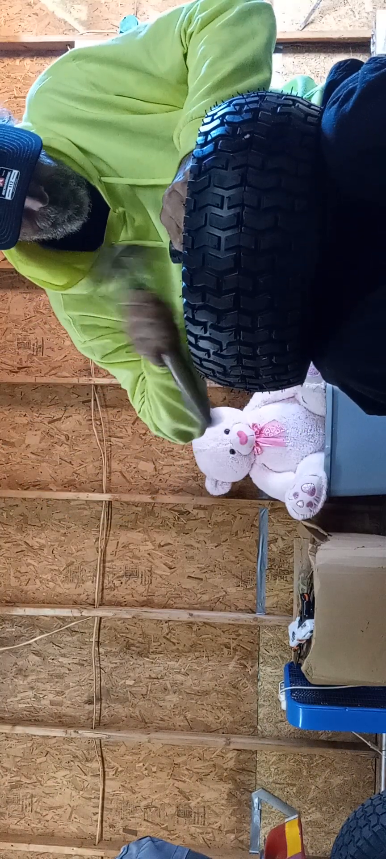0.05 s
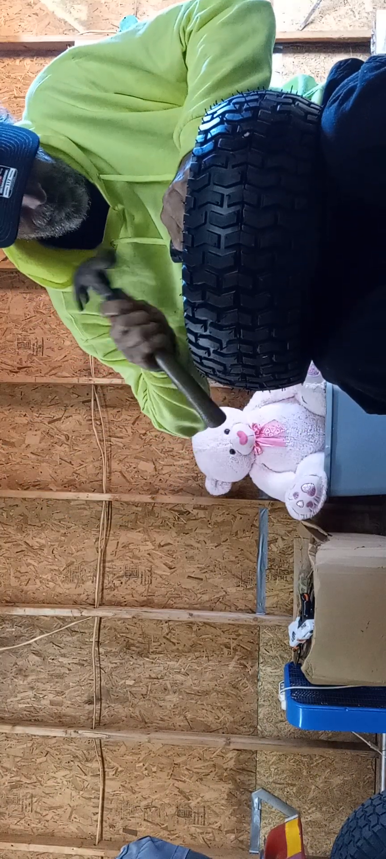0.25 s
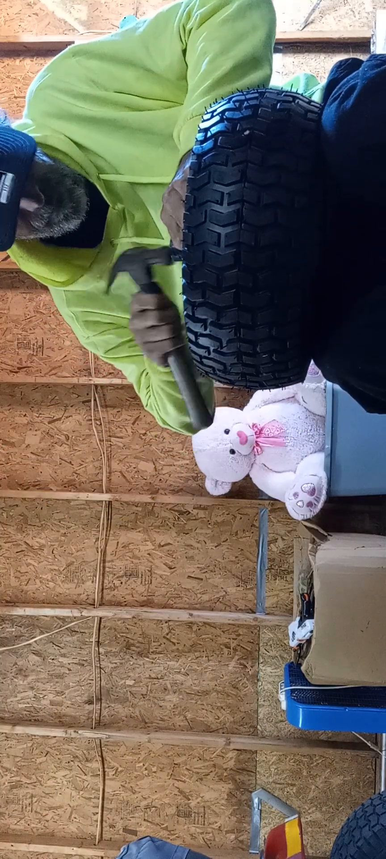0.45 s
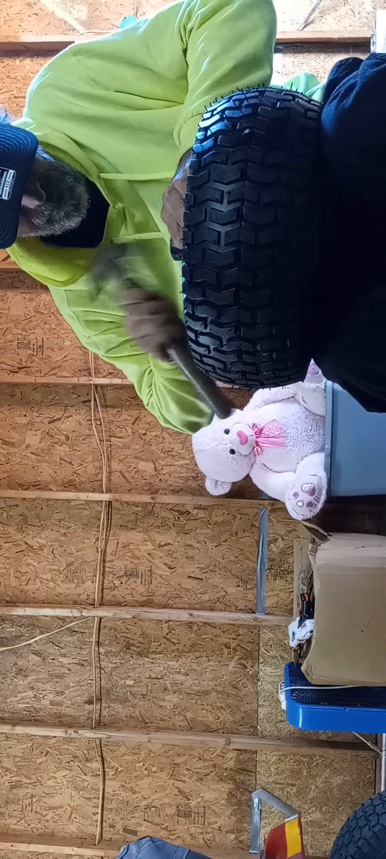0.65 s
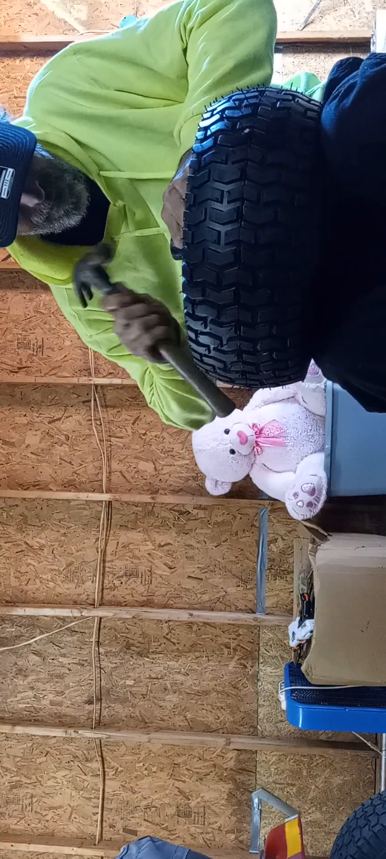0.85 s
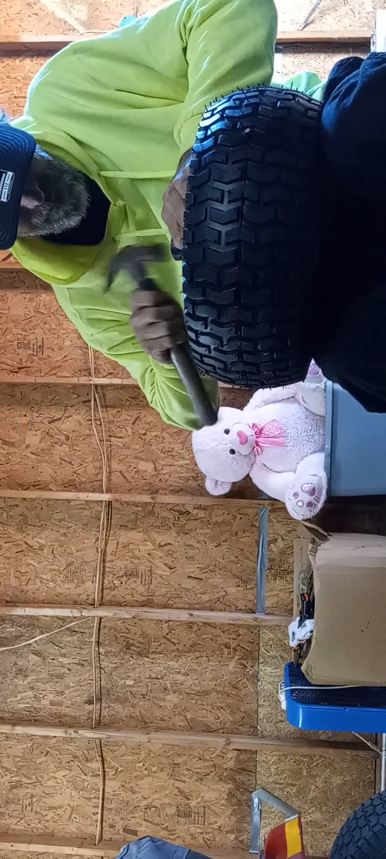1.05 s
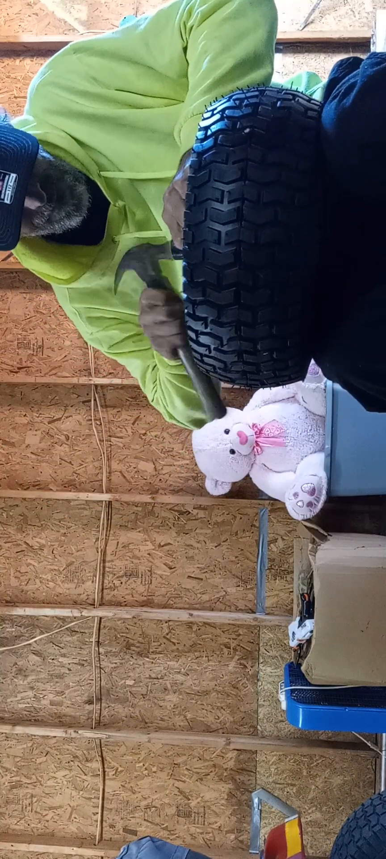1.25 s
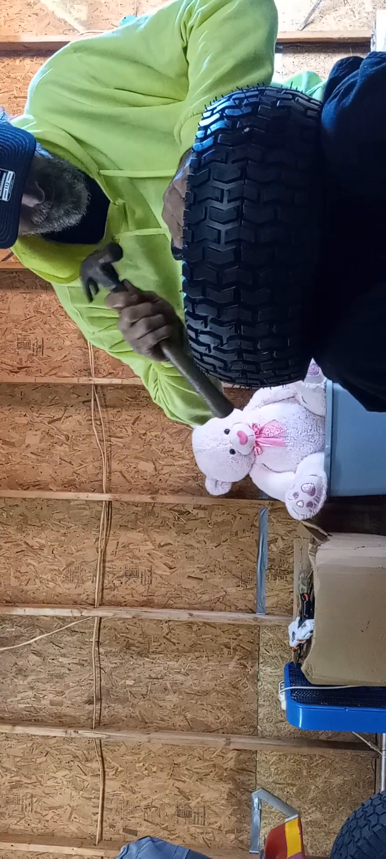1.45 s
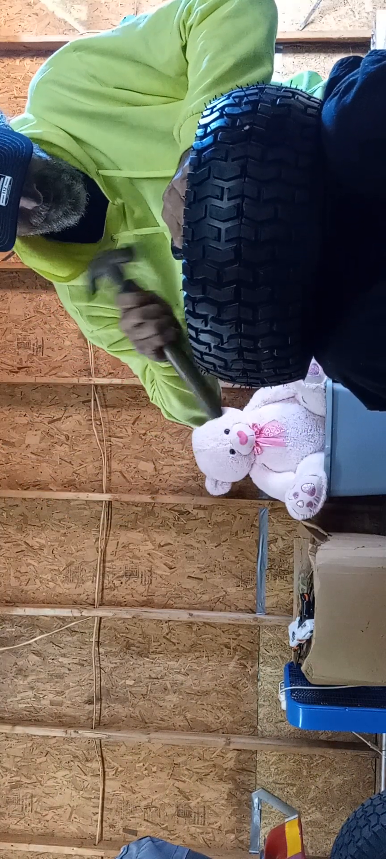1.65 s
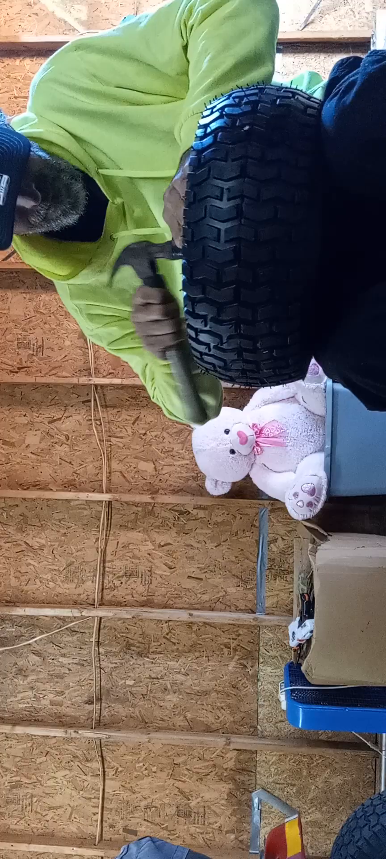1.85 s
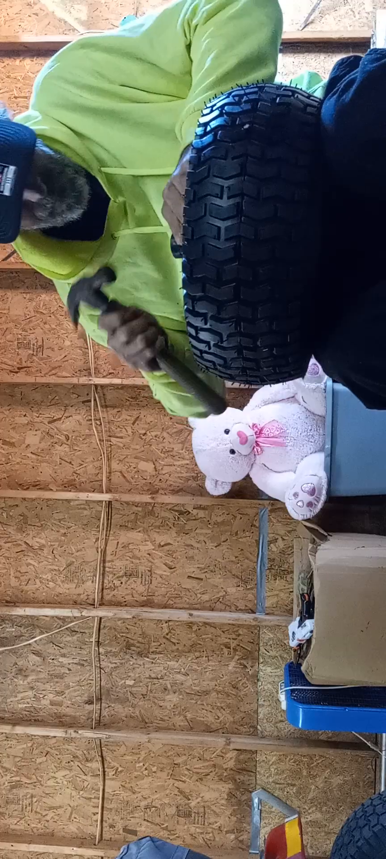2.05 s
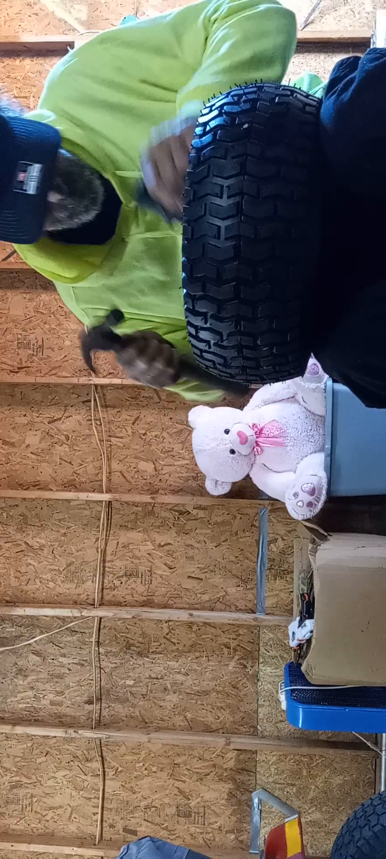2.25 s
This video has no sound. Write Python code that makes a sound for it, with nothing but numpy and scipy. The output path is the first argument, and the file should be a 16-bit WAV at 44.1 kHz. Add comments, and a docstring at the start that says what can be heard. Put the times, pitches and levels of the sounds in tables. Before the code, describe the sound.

Close to the microphone, a hammer hits a steel bearing in a wheel hub seven times at a steady pace. Each hard, hollow clank rings briefly with a short garage echo, then the wheel bumps softly.

```python
"""A claw hammer drives a bearing into the hub of a small tyred wheel, in a wooden garage.
Evenly paced blows: hard contact crack, hollow wheel thud, short ring of steel modes.
The garage answers each with the same wall echoes and standing waves, plus a noise tail.
Close range: the blows are limited and overload the microphone. Last, a soft bump as the wheel is handled."""
import sys
import numpy as np
from scipy import signal
from scipy.fft import rfft, irfft, next_fast_len
from scipy.io import wavfile
from scipy.ndimage import uniform_filter1d

SR = 44100
rng = np.random.default_rng(int(sys.argv[2]) if len(sys.argv) > 2 else 0)


def wrap_up_sound(samples):
    """Save the sound to the file named by the first command line argument, as 16-bit audio."""
    columns = np.atleast_2d(samples).T
    # keep every value between -1 and 1, then stretch to whole-number steps
    tamed = np.clip(columns, -1, 1)
    steps = np.round(tamed * 32767).astype(np.int16)
    wavfile.write(sys.argv[1], SR, steps)


N = 101429
AGE_S = np.arange(int(.8 * SR)) / SR

# hammer blows: (time [s], level [dB], bearing ring [dB], head ring [dB], rim ring [dB],
# treble shelf [dB], thud [dB], thud pitch [ratio])
HAMMER_BLOWS = [(-0.125, -7.5, -1, -3, -6, -4, -2.5, 1.0), (0.206, 0.5, -1, 0, 1, 1, -0.5, 1),
                (0.5303, 0, -3, 4, -4, 1, 0, 0.97), (0.8195, 0.5, 1, -15, -6, 0, 0, .98),
                (1.1033, 2, 0, 3.5, -13, -1.5, -0.5, 1), (1.3899, 0.5, -1, -0.5, -7, 1, -0.5, 1.01),
                (1.6604, 4.5, 1.5, -8.5, -12, -3, 0, 1.015), (1.9352, 0.5, 0, -7.5, -7.5, 3.5, -0.5, 1.03)]
# contact crack spectrum: (frequency [Hz], density [dB])
CRACK_SPECTRUM = [(30, -25), (100, -17), (250, -8.5), (600, -8), (1100, 9), (2000, 2), (2900, -1),
                  (3600, -15), (6000, -1), (9000, -17), (11000, -30), (16000, -6)]
# wheel thud: (frequency [Hz], level [dB], t60 [s])
WHEEL_MODES = [(435.7, -9.5, 0.045), (523.6, -3.5, 0.021), (696.7, -8, .028), (827, -16.5, 0.035),
               (1064, -17, 0.026), (1597, -17, 0.066), (1872, -27, 0.016)]
# seated bearing: (frequency [Hz], level [dB], t60 [s], left-right [dB])
BEARING_MODES = [(4420, -11.5, 0.021, 11), (4592, -23.5, 0.057, 21.5), (4728, -19.5, 0.022, 18),
                 (4860, -18, 0.01, 20.5), (6320, -26, 0.015, -24), (7060, -20, 0.013, -7),
                 (8610, -13, 0.0053, -4.5), (15460, -20.5, 0.021, -9)]
# hammer head: (frequency [Hz], level [dB], t60 [s], left-right [dB])
HEAD_MODES = [(5620, -20.5, 0.042, 11.5), (5642, -42, 0.35, -6.5)]
# wheel rim: (frequency [Hz], level [dB], t60 [s], left-right [dB])
RIM_MODES = [(778, -27, 0.066, 7), (1081, -46.5, 0.061, 0)]
# near-wall echoes: (delay [s], level [dB], left-right [dB])
WALL_ECHOES = [(0.0135, -7.5, -5.5), (.0205, -15, -5.5), (.041, -16, -5.5)]
# garage standing waves: (frequency [Hz], level [dB], t60 [s])
GARAGE_MODES = [(151.2, -40, .55), (187.3, -37.5, .48), (223.6, -43.5, 0.46), (303.1, -31, 0.54),
                (332.5, -28, 0.44), (382.5, -21.5, 0.37), (407, -29.5, 0.57), (435.6, -20.5, 0.33),
                (463.8, -24, 0.34), (491, -26.5, 0.34), (525, -25, .3), (607.3, -25, .4), (624, -32.5, .52),
                (690, -27.5, 0.47)]
# reverb spectrum: (frequency [Hz], density [dB])
TAIL_SPECTRUM = [(30, -45.5), (80, -35.5), (150, -9), (260, -8.5), (440, -4.5), (720, 0.5), (1050, -15.5),
                 (1500, -7), (2400, -13.5), (3600, -21.5), (4500, -18), (5200, -18.5), (6600, -18),
                 (9000, -25.5), (11000, -31), (15500, -24.5)]
# reverb decay: (frequency [Hz], t60 [s])
TAIL_DECAY = [(100, 0.49), (260, 0.56), (700, 0.47), (1840, 0.42), (4850, 0.34), (8000, .25), (12800, .19)]
# soft wheel bumps: (time [s], level [dB])
WHEEL_BUMPS = [(2.2115, -34.5), (2.219, -32.5), (2.2305, -39.5), (2.240, -43.5)]
# room response to a bump: (frequency [Hz], density [dB])
BUMP_SPECTRUM = [(100, -25), (300, -10.5), (550, 8), (800, -5), (1100, -16), (1600, -10), (2300, -31),
                 (4000, -44), (12000, -70.5)]
# still air: (frequency [Hz], density [dB])
AIR_SPECTRUM = [(30, -14), (120, 22), (600, -7), (2000, -58), (6000, -41), (16000, -70.5)]
# stereo likeness of all noise: (frequency [Hz], left-right correlation [ratio])
STEREO_CORRELATION = [(100, 1), (250, 0.95), (500, 0.24), (1000, 0), (2000, 0.011), (16000, 0)]

CRACK_DB, CRACK_T60_S, CRACK_PAN_DB, CRACK_FRESH_RATIO = -11, 0.029, -0.5, 0.77
TAIL_DB, TAIL_PAN_DB, TAIL_FRESH_RATIO, RING_REVERB_DB = -18, 2, 0.53, -6
RING_SWELL_DELAY_S, RING_SWELL_DB, RING_SWELL_T60_S = 0.057, -0.5, 0.047
THUD_ECHO_DB, TREBLE_SHELF_HZ = -1.5, 6630


def hammering():
    """Each blow: crack, thud and steel ring, then the garage's echoes and reverb."""
    out, crack_decay = np.zeros((2, N)), [(1000, CRACK_T60_S)]
    shared_crack = noise(CRACK_SPECTRUM, crack_decay)
    shared_tail = noise(TAIL_SPECTRUM, TAIL_DECAY)
    boom = garage_boom()
    garage_ir = noise([(1000, 0)], TAIL_DECAY) * build_up(rise_s=0.0085)
    garage_ir *= from_db(RING_REVERB_DB) / np.sqrt(np.sum(garage_ir ** 2) / 2)
    for time_s, level_db, bearing_db, head_db, rim_db, treble_db, thud_db, pitch_ratio in HAMMER_BLOWS:
        thud = from_db(thud_db) * wheel_thud(pitch_ratio)
        rings = from_db(bearing_db) * steel_ring(BEARING_MODES)
        rings += from_db(head_db) * steel_ring(HEAD_MODES)
        crack = blend(shared_crack, noise(CRACK_SPECTRUM, crack_decay), CRACK_FRESH_RATIO)
        crack *= from_db(CRACK_DB) * pan(CRACK_PAN_DB)
        tail = blend(shared_tail, noise(TAIL_SPECTRUM, TAIL_DECAY), TAIL_FRESH_RATIO)
        tail *= from_db(TAIL_DB) * pan(TAIL_PAN_DB) * build_up(rise_s=0.0013)
        clank = crack + rings + from_db(rim_db) * steel_ring(RIM_MODES)
        ring_reverb = signal.fftconvolve(rings.mean(axis=0, keepdims=True), garage_ir, axes=1)
        blow = clank + thud + tail + boom + ring_reverb[:, :len(AGE_S)]
        blow += near_wall_echoes(clank + from_db(THUD_ECHO_DB) * thud)
        add(blow, RING_SWELL_DELAY_S, from_db(bearing_db) * bearing_ring_swell())
        treble = butterworth(blow, 1, TREBLE_SHELF_HZ, "high")
        blow += (from_db(treble_db) - 1) * treble
        add(out, time_s, from_db(level_db) * blow)
    return out


def wheel_thud(pitch_ratio=1, lag_s=0.002135, pan_db=3, low_cut_hz=306):
    """Damped low modes just after contact; pitch depends on how the blow lands."""
    out = np.zeros((2, len(AGE_S)))
    modes = sum(mode(hz * pitch_ratio, db, t60_s) for hz, db, t60_s in WHEEL_MODES)
    add(out, lag_s, pan(pan_db) * modes)
    return butterworth(out, 2, low_cut_hz, "high")   # a small wheel radiates no bass


def steel_ring(modes, scatter_db=0.66, low_cut_hz=500):
    """Struck steel: modes of alternating sign, levels scattered per blow."""
    out = 0
    for k, (hz, db, t60_s, pan_db) in enumerate(modes):
        struck_db = db - scatter_db * rng.standard_normal()
        out += (-1) ** k * pan(pan_db) * mode(hz, struck_db, t60_s)
    return butterworth(out, 2, low_cut_hz, "high")


def bearing_ring_swell():
    """The bearing's clearest tone swells again briefly after the blow."""
    hz, db = BEARING_MODES[1][:2]
    return from_db(RING_SWELL_DB) * pan(TAIL_PAN_DB) * mode(hz, db, RING_SWELL_T60_S)


def near_wall_echoes(direct, cutoff_hz=6490):
    """Early reflections, dulled by the wooden walls."""
    out, dulled = np.zeros_like(direct), butterworth(direct, 1, cutoff_hz, "low")
    for delay_s, level_db, pan_db in WALL_ECHOES:
        add(out, delay_s, from_db(level_db) * pan(pan_db) * dulled)
    return out


def garage_boom(spread_rad=0.36, pan_db=0.5):
    """Standing waves, slightly out of phase between the ears."""
    waves = 0
    for hz, db, t60_s in GARAGE_MODES:
        phase_rad = rng.uniform(0, 2 * np.pi) + spread_rad * rng.standard_normal((2, 1))
        waves += mode(hz, db, t60_s, phase_rad)
    return pan(pan_db) * build_up(rise_s=0.012) * waves


def wheel_handling(thud_db=-3, room_db=-12, room_t60_s=0.15, cutoff_hz=2500):
    """Soft contacts: only the wheel's low modes, plus a short room tail."""
    out, thud = np.zeros((2, N)), from_db(thud_db) * wheel_thud()
    for time_s, level_db in WHEEL_BUMPS:
        room = from_db(room_db) * noise(BUMP_SPECTRUM, [(1000, room_t60_s)])
        add(out, time_s, from_db(level_db) * (thud + room))
    return butterworth(out, 2, cutoff_hz, "low")


def still_air(level_db=-68):
    """Faint, steady low noise."""
    return from_db(level_db) * noise(AIR_SPECTRUM, size=next_fast_len(N))[:, :N]


def mode(hz, db, t60_s, phase_rad=0):
    """One struck mode: a decaying sine."""
    return from_db(db - 60 * AGE_S / t60_s) * np.sin(2 * np.pi * hz * AGE_S + phase_rad)


def noise(spectrum, decay=None, size=len(AGE_S)):
    """Banded stereo noise, initial rms 1; optional t60 per band."""
    edges_hz = np.r_[20, 60, 100, np.geomspace(130, 17000, 29)]
    bins_hz, white = np.fft.rfftfreq(size, 1 / SR), rfft(rng.standard_normal((2, size)))
    out, power = 0, 0
    for low_hz, high_hz in zip(edges_hz, edges_hz[1:]):
        hz = np.sqrt(low_hz * high_hz)
        fade = from_db(-60 * AGE_S / at_hz(decay, hz)) if decay else np.ones(size)
        band = irfft(white * ((bins_hz >= low_hz) & (bins_hz < high_hz)), size) * fade
        mid, side = band * np.sqrt(np.sum(fade ** 2) / np.sum(band ** 2, axis=1, keepdims=True))
        correlation = at_hz(STEREO_CORRELATION, hz)
        gain = from_db(at_hz(spectrum, hz)) * np.sqrt(high_hz - low_hz)
        out += gain * (np.sqrt(1 + correlation) * mid + np.sqrt(1 - correlation) * side * [[1], [-1]])
        power += 2 * gain ** 2
    return out / np.sqrt(power)


def blend(shared, fresh, fresh_ratio):
    """Constant-power mix of shared and per-blow noise."""
    return (shared + fresh_ratio * fresh) / np.sqrt(1 + fresh_ratio ** 2)


def build_up(rise_s, onset_s=0.0022):
    """Reflections start just after the blow and swell."""
    return 1 - np.exp(-np.maximum(AGE_S - onset_s, 0) / rise_s)


def from_db(db):
    """Decibels to gain."""
    return 10 ** (np.asarray(db) / 20)


def pan(db):
    """Stereo gains for a left-right difference."""
    return from_db([[db / 2], [-db / 2]])


def at_hz(table, hz):
    """Table lookup, log-frequency axis."""
    points_hz, values = np.transpose(table)
    return np.interp(np.log(hz), np.log(points_hz), values)


def butterworth(x, order, cutoff_hz, kind):
    """Causal low- or high-pass."""
    return signal.sosfilt(signal.butter(order, cutoff_hz, kind, fs=SR, output="sos"), x)


def add(out, time_s, sound):
    """Mix in at a time; drop what falls outside."""
    offset = int(round(time_s * SR))
    start = max(offset, 0)
    part = sound[:, max(-offset, 0):max(out.shape[1] - offset, 0)]
    out[:, start:start + part.shape[1]] += part


def limiter(x, threshold_db=-7, detect_s=0.006, look_ahead_s=0.031, release_db_per_s=41):
    """Gain ducks ahead of each blow and recovers through its tail."""
    power = uniform_filter1d(np.mean(x ** 2, axis=0), int(detect_s * SR))
    over_db = np.maximum(10 * np.log10(np.maximum(power, 1e-12)) - threshold_db, 0)
    recovery_db = release_db_per_s * np.arange(N) / SR
    held_db = np.maximum.accumulate(over_db + recovery_db) - recovery_db
    ahead = int(look_ahead_s * SR)
    duck_db = uniform_filter1d(np.pad(held_db, (0, ahead), "edge"), ahead)[ahead // 2:][:N]
    return x * from_db(-duck_db)


def scene(right_lag_s=0.00011):
    """Wheel slightly to the left, over still air."""
    work = hammering() + wheel_handling()
    out = still_air()
    add(out[:1], 0, work[:1])
    add(out[1:], right_lag_s, work[1:])
    return out


def record(dry, drive_db=7, low_cut_hz=36, high_cut_hz=15400):
    """Limiter, soft overload of the remaining peaks, band limits."""
    limited = limiter(from_db(drive_db) * dry)
    clipped = limited / (1 + limited ** 8) ** .125
    steep_low_pass = signal.ellip(10, .2, 70, high_cut_hz, fs=SR, output="sos")
    return signal.sosfilt(steep_low_pass, butterworth(clipped, 1, low_cut_hz, "high"))


dry = scene()
out = record(dry)
wrap_up_sound(out)
```